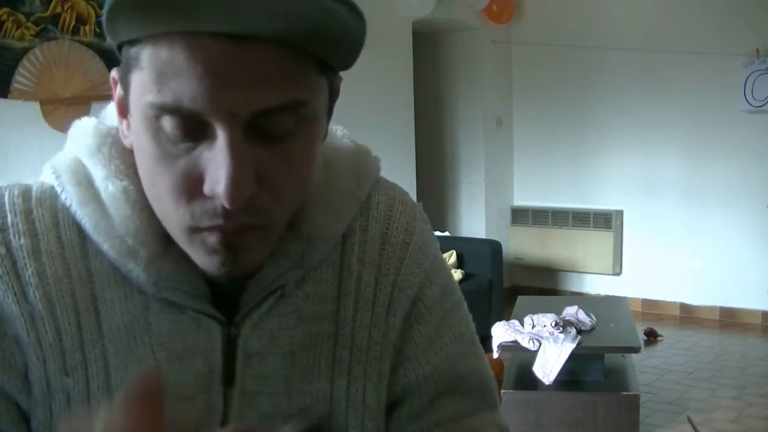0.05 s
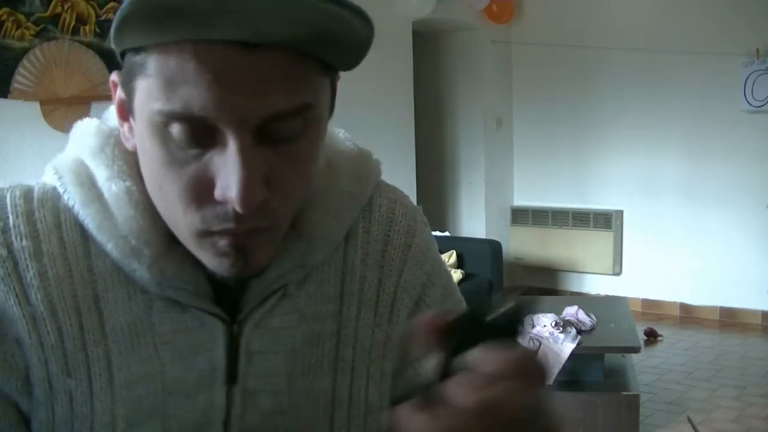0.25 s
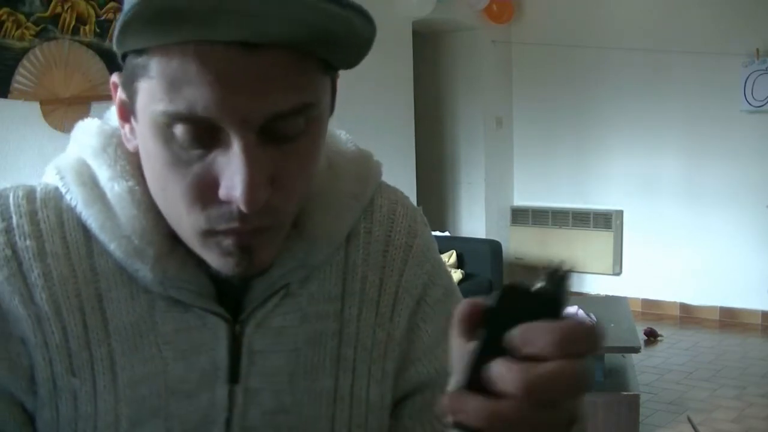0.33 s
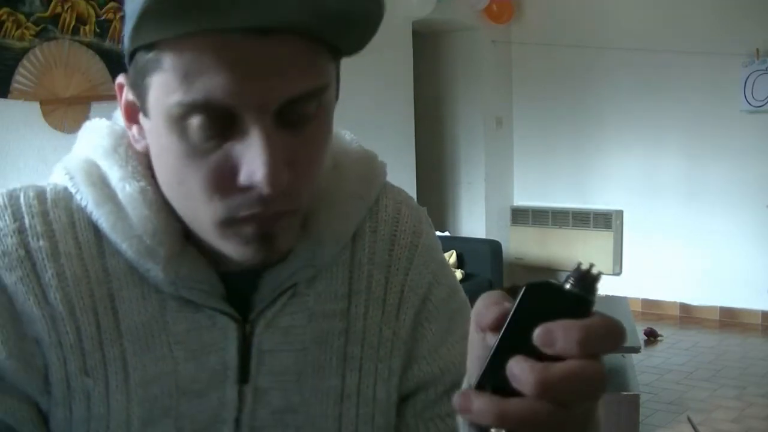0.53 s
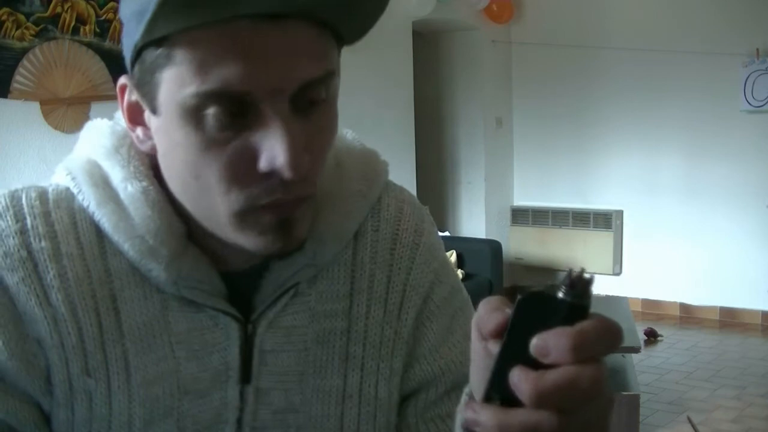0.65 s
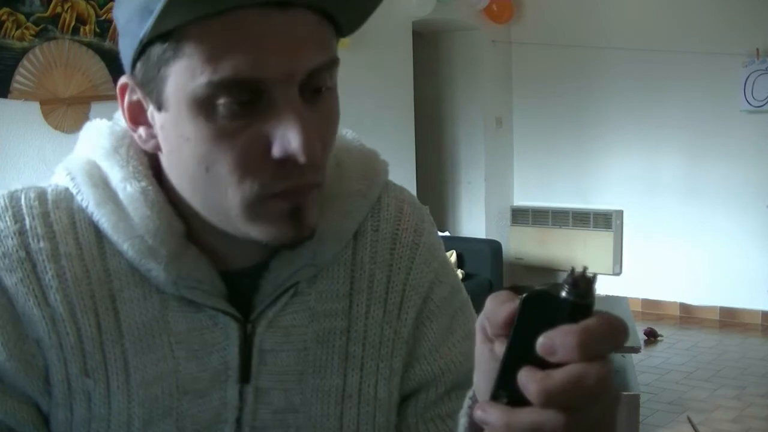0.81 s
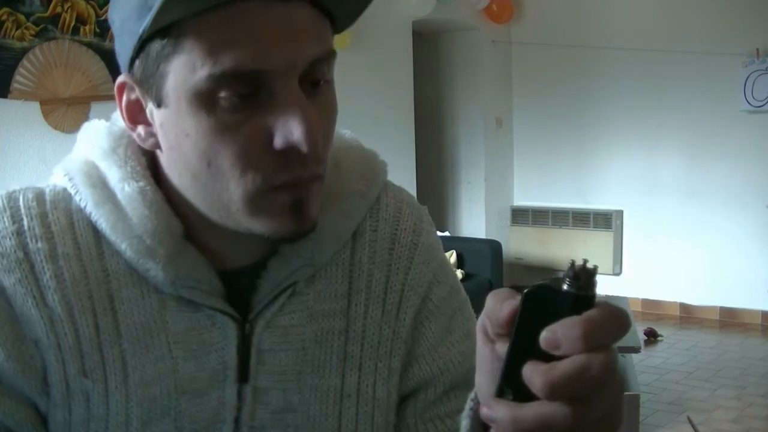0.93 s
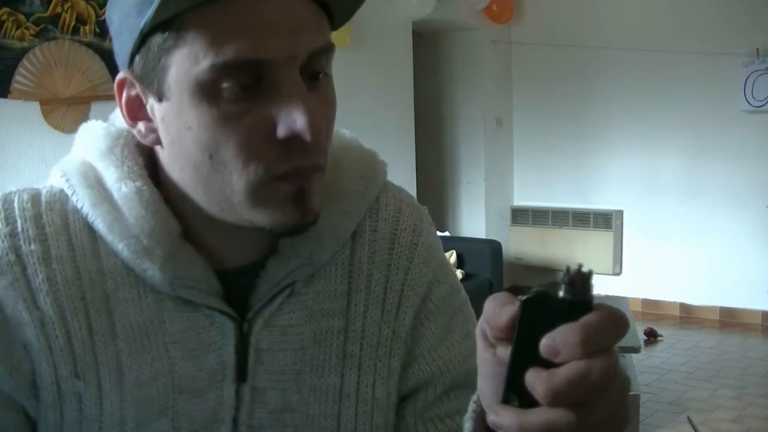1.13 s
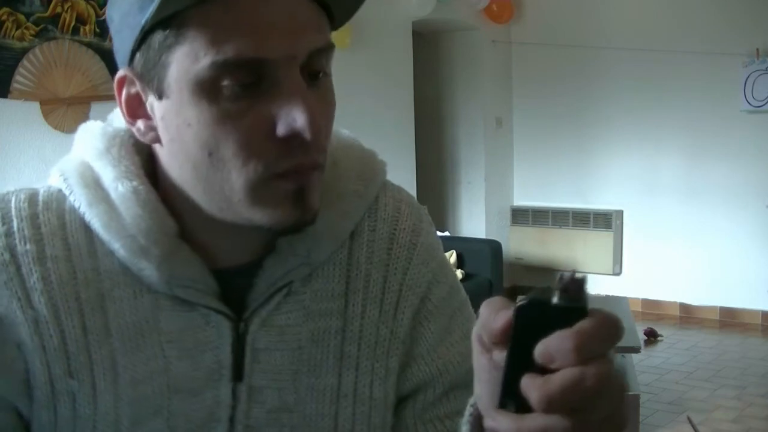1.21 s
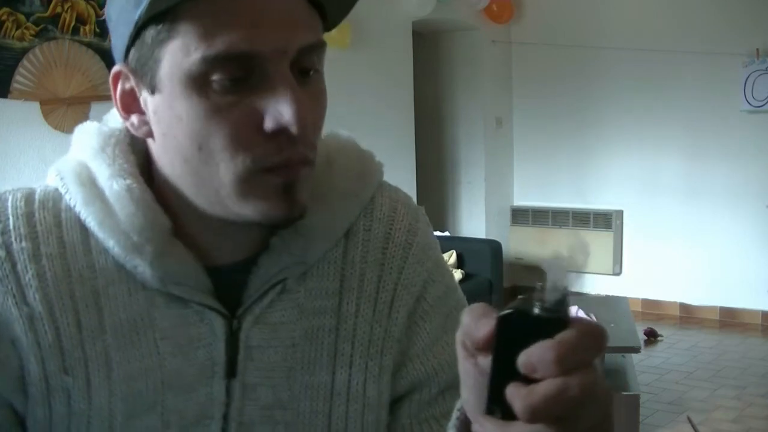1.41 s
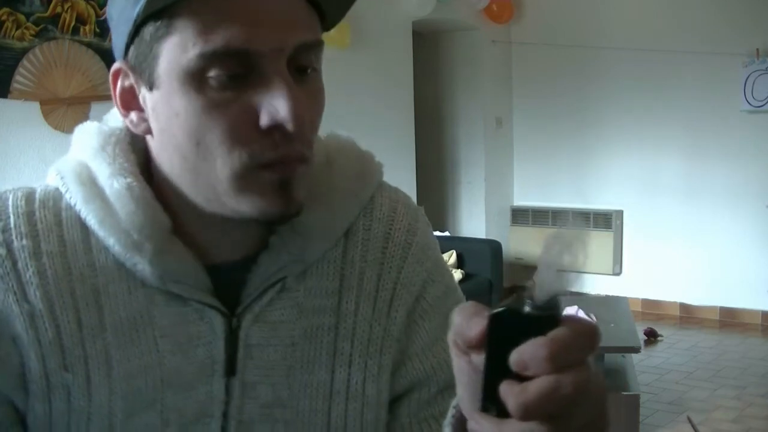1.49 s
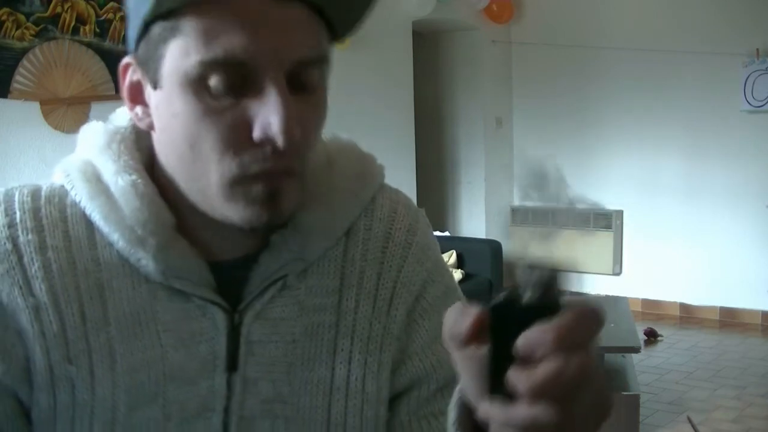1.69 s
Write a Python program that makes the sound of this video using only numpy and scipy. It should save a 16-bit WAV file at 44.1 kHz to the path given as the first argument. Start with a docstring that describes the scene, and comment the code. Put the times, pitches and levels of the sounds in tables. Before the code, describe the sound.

A handheld vaporizer sizzles briefly close to the microphone in a small, quiet room. First its case clicks and knocks sound on a desk as it is picked up, then the coil spits, hisses and fades.

```python
"""A low hum and faint hiss fill a small room. A handheld vaporizer is picked up: its case clicks,
and knocks ring the desk, with low thuds beneath. A few thin, distant pips follow. Then the device
is fired close to a desk microphone and liquid boils on the hot coil: sharp spits and dense tiny
bursts excite the resonances of the metal deck, over one more soft thud. The sizzle dies away as
the coil cools."""
import sys
import numpy as np
from scipy import signal
from scipy.fft import rfft, irfft, next_fast_len
from scipy.io import wavfile

SR = 44100
rng = np.random.default_rng(int(sys.argv[2]) if len(sys.argv) > 2 else 0)


def inscribe(sig):
    """Save sig as 16-bit PCM at rate SR to the path in sys.argv[1].

    A 1-D sig is mono; a 2-D sig holds one channel per row.
    Samples are clipped to [-1, 1] before scaling.
    """
    pcm = np.round(np.clip(np.atleast_2d(sig).T, -1, 1) * 32767)
    wavfile.write(sys.argv[1], SR, pcm.astype(np.int16))


N = 77175
FREQ = np.maximum(np.fft.rfftfreq(2 ** 14, 1 / SR), 1)

# spectrum of the room noise and hiss: frequency_hz, relative_db
FLOOR_SPECTRUM = [(25, -4), (50, 1), (130, -2), (200, -1), (380, -3), (650, -14), (1200, -15), (2700, -11),
                  (5000, -14), (8000, -18), (12000, -22), (15500, -28.5)]
# stereo width of that noise: frequency_hz, side_over_mid_db
FLOOR_WIDTH = [(80, -0.5), (400, 5.5), (1500, 2), (8000, -1.5)]
FLOOR_DB, HUM_HZ, HUM_DB, HUM_PAN_DB = -57.5, 90.1, -57.5, -3.5

# clicks of the case: start_s, energy_db, ring_hz, ring_lift_db, contact_corner_hz
CLICKS = [(.187, -30, 2580, -1, 4370), (0.2409, -10, 2380, 7.5, 15000), (0.2423, -19, 4170, 13, 9100),
          (0.247, -21.5, 2500, 1, 7000), (0.5906, -22.5, 3160, 14, 4200), (0.716, -38, 2800, 18, 3500)]
# spectrum of a click: frequency_hz, relative_db
CLICK_SPECTRUM = [(200, 6.5), (550, -7.5), (880, -7.5), (1500, 4), (2600, 2), (4000, 3.5), (6200, -1.5),
                  (8000, -21.5), (11000, -8), (15000, -56)]

# knocks on the desk: start_s, energy_db, contact_corner_hz, pitch_ratio
KNOCKS = [(0.2447, -6, 358, 0.59), (0.5135, -9.5, 4530, 0.8), (0.5156, -4.5, 2100, 0.98),
          (.531, -16, 2220, 1.0), (0.569, -19.5, 418, .72)]
# spectrum of a knock at pitch ratio 1: frequency_hz, relative_db
KNOCK_SPECTRUM = [(60, -16), (200, -6.5), (400, -1), (600, -4.5), (900, -5), (1350, -6.5), (1800, -10.5),
                  (3300, -14), (5000, -16.5), (7000, -27.5), (12000, -23.5)]
# resonances of the desk at pitch ratio 1: frequency_hz, bandwidth_hz, lift_db
DESK_MODES = [(333.8, 20, 8.5), (380, 50, 6), (476.3, 34, 9.5), (745, 20, 8), (860, 25, 0.5),
              (997, 40, 0.5), (1335, 39, 6)]

# low thuds: start_s, gain_db
THUDS = [(0.271, -24), (.53, -32.5), (1.256, -38.5)]
# partials of a thud: frequency_hz, relative_db, t60_s
THUD_MODES = [(57, -11, 0.37), (103.7, 0, 0.22), (125, 0.5, 0.082), (200.9, -17, 0.27)]

# distant pips: centre_s, level_db
PIPS = [(.645, -62.5), (0.693, -65.5), (.772, -65.5), (.85, -65.5), (.89, -67), (0.936, -63), (1.01, -68),
        (1.052, -63)]

# strength of the boiling: time_s, level_db
BOIL_ENVELOPE = [(1.0, -77), (1.09, -64), (1.165, -56), (1.19, -45.5), (1.235, -48), (1.29, -46.5),
                 (1.389, -44), (1.472, -51), (1.6, -56.5), (1.75, -62)]
# drops spitting off the coil: start_s, energy_db, tilt_db_per_octave, body_hz, body_lift_db
SPITS = [(1.1061, -28, 0, 5000, 7), (1.173, -18.5, -4, 4000, 13), (1.1841, -18.5, 11.5, 5000, 28),
         (1.1857, -35, 6, 5000, -10), (1.1875, -24.5, -3.5, 5000, -3), (1.1963, -8.5, 1, 1450, 17),
         (1.1993, -19, -3, 1720, 2), (1.2497, -6, -3.5, 4200, 9.5), (1.3021, -14.5, 2, 1470, 8.5),
         (1.384, -18, -1, 1490, -0.5)]
# spectrum of a burst: frequency_hz, relative_db
BURST_SPECTRUM = [(150, -32), (450, -24.5), (800, -26), (1400, -17.5), (2400, -9), (3600, -7.5), (5200, 0),
                  (7300, -8.5), (11700, -15.5), (12600, -12), (13100, -6.5), (13700, -28), (15500, -32)]
# resonances of the metal deck: frequency_hz, bandwidth_hz, lift_db
DECK_MODES = [(1036, 150, 11), (1750, 200, 9.5), (2344, 89, 10), (2800, 290, 8.5), (3502, 81, 12.5),
              (4187, 94, 7), (4454, 39, 10), (4686, 116, 9), (4803, 41, 8), (5060, 50, -7),
              (5530, 160, 4.5), (6450, 200, 0), (8700, 350, 2)]
# the coil's balance between the microphone ports: frequency_hz, left_minus_right_db
COIL_BALANCE = [(1500, -0.5), (2800, 0), (4500, -2.5), (5800, 0), (6700, 13), (7700, -1), (8600, -5),
                (10000, -13.5), (11500, 5.5), (13000, -1.5)]

# stereo width of the reflections: frequency_hz, side_over_mid_db
ROOM_WIDTH = [(60, 3.5), (200, 0.5), (700, -15.5), (2000, -8), (4500, -5.5), (8000, -20), (14000, 16)]
ROOM_T60_S, TREBLE_T60_S, ROOM_DELAY_S = 0.43, 0.39, 0.0042


def amp(db):
    """Amplitude ratio: tenfold for every 20 dB."""
    return 10 ** (np.asarray(db) / 20)


def decay(t, t60):
    """Exponential damping: 60 dB down after t60 seconds."""
    return np.exp(-np.log(1000) * t / t60)


def curve(points):
    """Interpolation of a spectrum in dB on a log-frequency axis."""
    hz, db = np.array(points, float).T
    return np.interp(np.log(FREQ), np.log(hz), db)


def resonances(modes, ratio=1):
    """Resonance: each mode adds a Lorentzian peak or dip in dB."""
    return sum(db / (1 + (2 * (FREQ / ratio - hz) / width) ** 2) for hz, width, db in modes)


def hump(hz, octaves):
    """A broad resonance: a Gaussian bell in log frequency, 1 at its top."""
    return np.exp(-(np.log2(FREQ / hz) / octaves) ** 2 / 2)


def soft_contact(corner_hz):
    """A soft contact spreads the force in time, a low-pass response in dB."""
    return -10 * np.log10(1 + (FREQ / corner_hz) ** 4)


def unit_energy(db):
    """Normalisation of a spectrum to a mean power gain of one."""
    return db - 10 * np.log10(np.mean(amp(db) ** 2))


def impulse(start_s, db):
    """An impulse excites all frequencies equally."""
    return amp(db) * (np.arange(N) == int(start_s * SR))


def convolve(x, response):
    """Convolution: the spectra of sound and response multiply."""
    size = next_fast_len(x.shape[-1] + response.shape[-1], True)
    return irfft(rfft(x, size) * rfft(response, size))[..., :x.shape[-1]]


def colour(x, db):
    """Minimum-phase filtering is causal, so resonances ring after each blow."""
    cepstrum = irfft(db * np.log(10) / 20)
    half = len(cepstrum) // 2
    cepstrum[1:half] *= 2
    cepstrum[half + 1:] = 0
    return convolve(x, irfft(np.exp(rfft(cepstrum))))


def stereo_noise(width, size=N):
    """Partial coherence: two ports get the same mid noise and opposite side noise."""
    mid, side = rng.standard_normal((2, size))
    side_db = curve(width)
    pair = mid + np.array([[1], [-1]]) * colour(side, side_db)
    return colour(pair, -10 * np.log10(1 + amp(side_db) ** 2))  # white again


def room(x, near_db, tail_db, near_t60_s):
    """Reverberation: direct sound, quick nearby scatter, then a tail that is shorter in the treble."""
    t = np.arange(SR // 2) / SR
    noise = stereo_noise(ROOM_WIDTH, size=len(t))
    near = noise[:, ::-1] * decay(t, near_t60_s) * (t > .0005)
    low = colour(noise, -10 * np.log10(1 + (FREQ / 1500) ** 2))
    tail = (low * decay(t, ROOM_T60_S) + (noise - low) * decay(t, TREBLE_T60_S)) * (t > ROOM_DELAY_S)
    reflections = sum(amp(db) * part / np.sqrt(np.sum(part ** 2) / 2)
                      for part, db in [(near, near_db), (tail, tail_db)])
    return x + convolve(x, reflections)


def background():
    """Stationary sound: a pure low hum over broadband room noise and hiss."""
    hum = np.sqrt(2) * np.sin(2 * np.pi * HUM_HZ * np.arange(N) / SR)
    hum_gains = amp(HUM_DB + np.array([[HUM_PAN_DB], [-HUM_PAN_DB]]) / 2)
    hiss = colour(stereo_noise(FLOOR_WIDTH), unit_energy(curve(FLOOR_SPECTRUM)))
    return hum_gains * hum + amp(FLOOR_DB) * hiss


def case_clicks():
    """Impact excitation: hard contacts ring the case briefly as it is gripped."""
    clicks = 0
    for start, db, ring_hz, ring_db, corner_hz in CLICKS:
        body = curve(CLICK_SPECTRUM) + ring_db * hump(ring_hz, octaves=0.33)
        clicks += colour(impulse(start, db), unit_energy(body + soft_contact(corner_hz)))
    return room(clicks, near_db=-2, tail_db=-5.5, near_t60_s=0.043)


def desk_knocks():
    """Modal response: each knock or bounce sets the desk's hollow resonances ringing."""
    knocks = 0
    for start, db, corner_hz, ratio in KNOCKS:
        body = curve([(hz * ratio, level) for hz, level in KNOCK_SPECTRUM])
        body += resonances(DESK_MODES, ratio)
        knocks += colour(impulse(start, db), unit_energy(body + soft_contact(corner_hz)))
    return room(knocks, near_db=0.5, tail_db=-5.5, near_t60_s=0.082)


def thuds(rise_s=0.015):
    """Damped oscillation: low partials swell briefly and ring out."""
    booms = 0
    for start, gain_db in THUDS:
        age = np.maximum(np.arange(N) / SR - start, 0)
        ring = sum(amp(db) * np.sin(2 * np.pi * hz * age) * decay(age, t60)
                   for hz, db, t60 in THUD_MODES)
        booms += amp(gain_db) * ring * (1 - np.exp(-age / rise_s))
    return booms


def pips(pitch_hz=3160, band_hz=300, sigma_s=0.0098):
    """Amplitude modulation: Gaussian pulses of narrow-band noise sound as thin, far-off pips."""
    t = np.arange(N) / SR
    band_db = -20 * np.log10(1 + (2 * (FREQ - pitch_hz) / band_hz) ** 2)
    band = colour(rng.standard_normal(N), band_db)
    envelope = sum(amp(db) * np.exp(-((t - centre) / sigma_s) ** 2 / 2) for centre, db in PIPS)
    return band / band.std() * envelope


def fizz(bursts_per_s=5000, spread_db=3, steam_db=-4):
    """Shot noise: tiny random bursts of uneven size, over steam, follow the strength of the boiling."""
    bursts = (rng.random(N) < bursts_per_s / SR) * rng.choice([-1, 1], N)
    bursts = bursts * amp(spread_db * np.minimum(rng.exponential(size=N), 4))
    sizzle = bursts / bursts.std() + amp(steam_db) * rng.standard_normal(N)
    boil_db = np.interp(np.arange(N) / SR, *np.array(BOIL_ENVELOPE).T, left=-120)
    return sizzle / sizzle.std() * amp(boil_db)


def spits(ring_share=0.91, spray_decay_s=0.0018):
    """Transient excitation: each drop cracks, rings the deck and trails a brief spray."""
    t = np.arange(SR // 100) / SR
    deck = curve(BURST_SPECTRUM) + ring_share * resonances(DECK_MODES)
    drops = 0
    for start, db, tilt, body_hz, body_db in SPITS:
        spray = rng.standard_normal(len(t)) * np.exp(-t / spray_decay_s) * (t > .0002)
        push = (t == 0) + spray / np.linalg.norm(spray)
        spectrum = deck + tilt * np.log2(FREQ) + body_db * hump(body_hz, octaves=0.67)
        crack = colour(impulse(start, db), unit_energy(spectrum))
        drops += convolve(crack, push / np.linalg.norm(push))
    return drops


def coil(spot_count=3):
    """Source and filter: boiling spots and spits ring the deck and reach the ports by separate paths."""
    deck = unit_energy(curve(BURST_SPECTRUM) + resonances(DECK_MODES))
    spots = [colour(fizz(), deck) / np.sqrt(spot_count) for _ in range(spot_count)]
    left, right = sum(room(source, near_db=-1.5, tail_db=-9.5, near_t60_s=0.026)
                      for source in spots + [spits()])
    balance_db = curve(COIL_BALANCE) / 2
    return np.array([colour(left, balance_db), colour(right, -balance_db)])


def scene():
    """Superposition: the sizzle, the handling and the pips add to the quiet room."""
    return coil() + case_clicks() + desk_knocks() + thuds() + pips() + background()


def record(dry):
    """Band limiting: the recorder cuts the bass below 32 Hz and the treble above 15.8 kHz."""
    dry = signal.sosfilt(signal.butter(2, 32, "high", fs=SR, output="sos"), dry)
    return signal.sosfilt(signal.ellip(10, .2, 70, 15800, fs=SR, output="sos"), dry)


dry = scene()
out = record(dry)
inscribe(out)
```